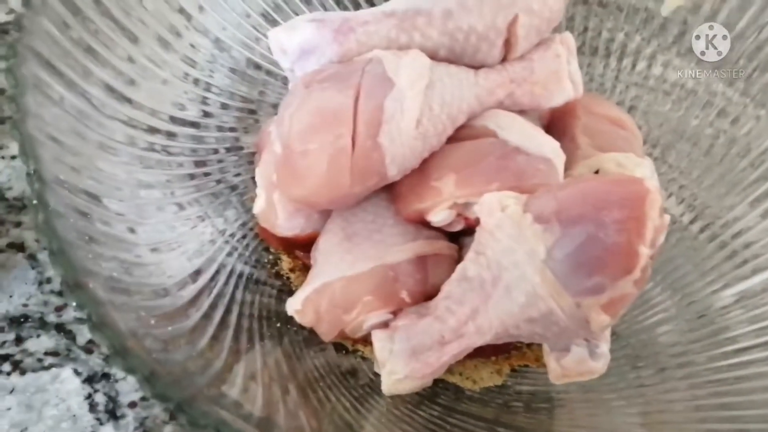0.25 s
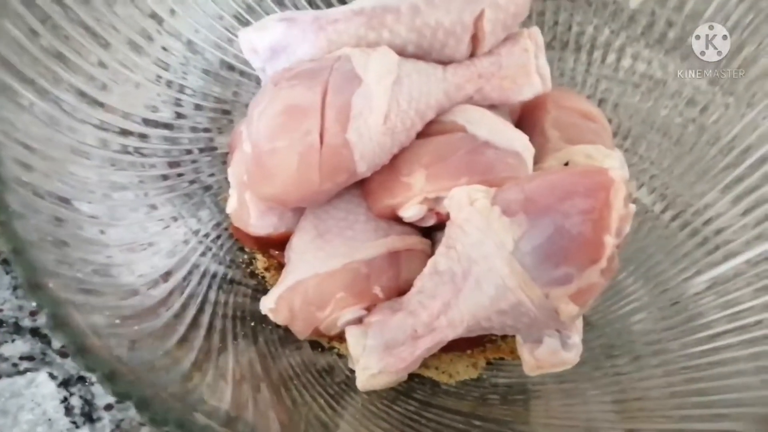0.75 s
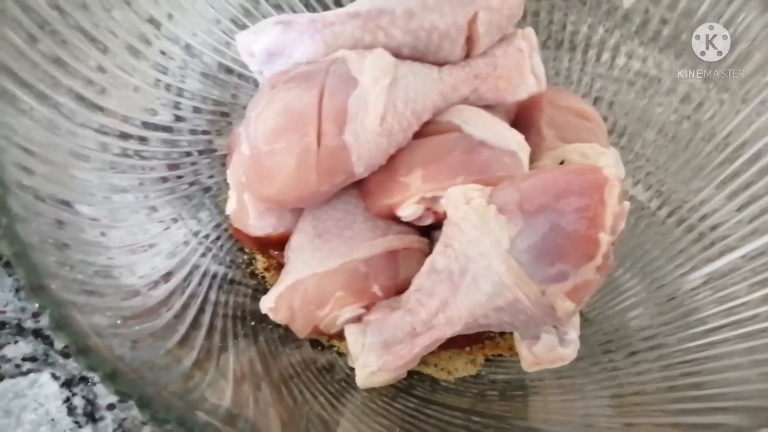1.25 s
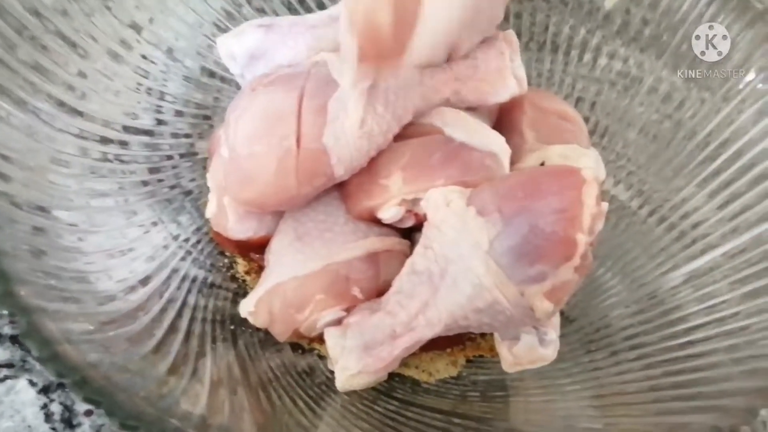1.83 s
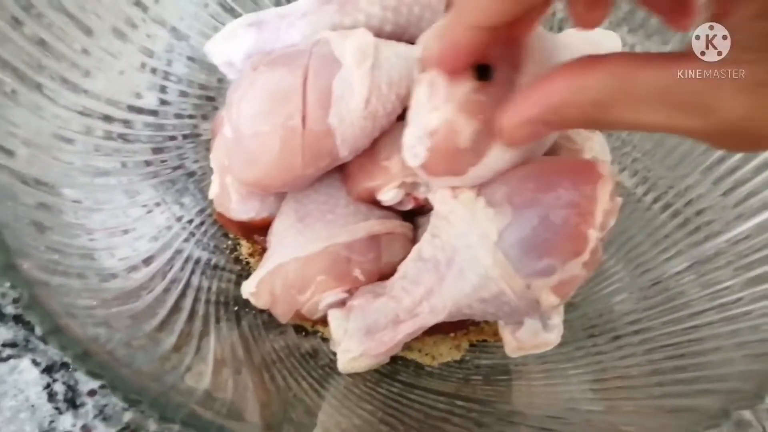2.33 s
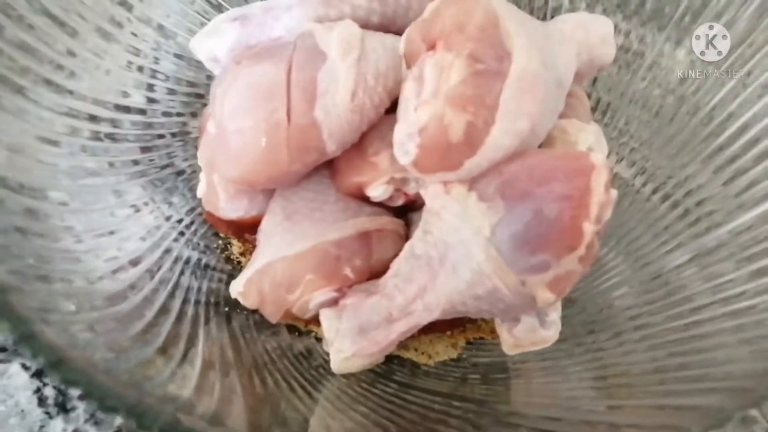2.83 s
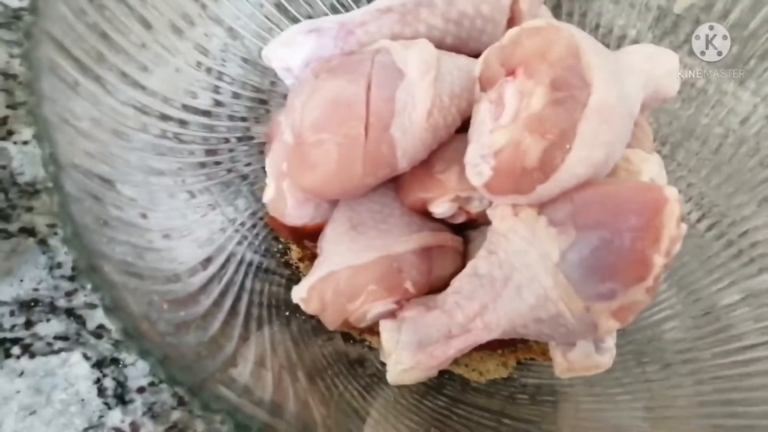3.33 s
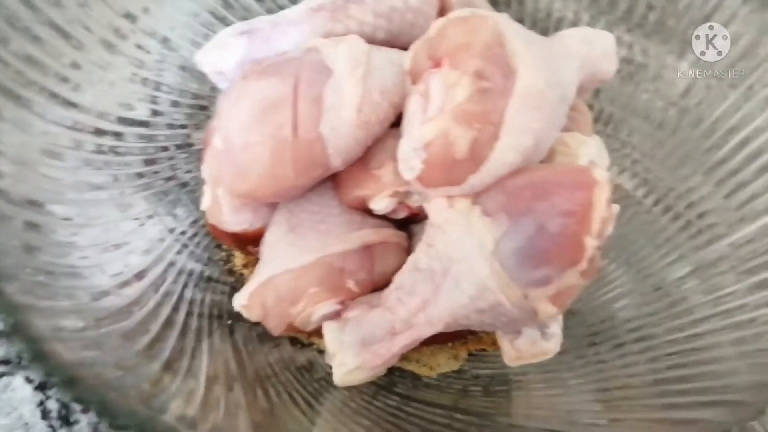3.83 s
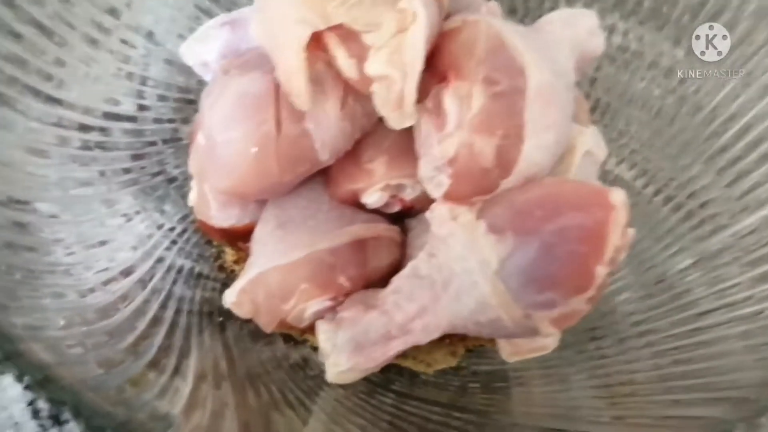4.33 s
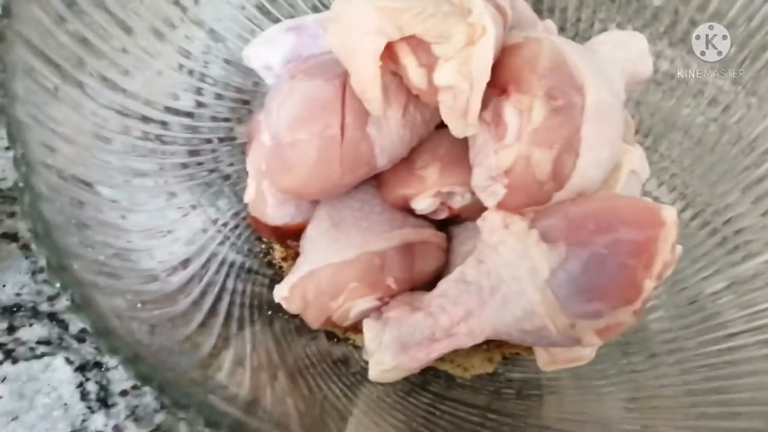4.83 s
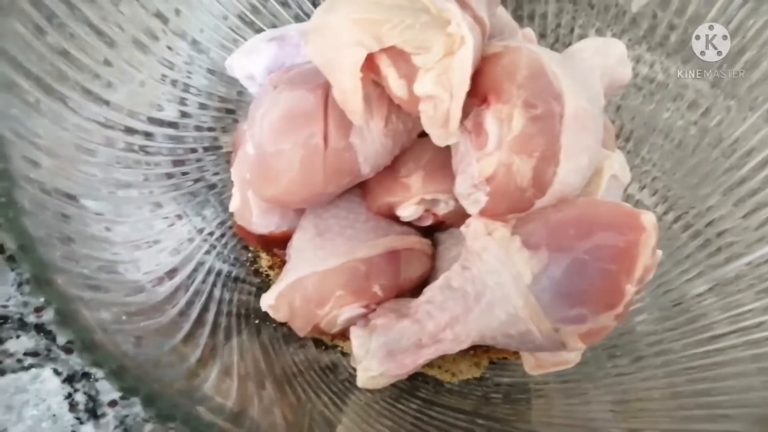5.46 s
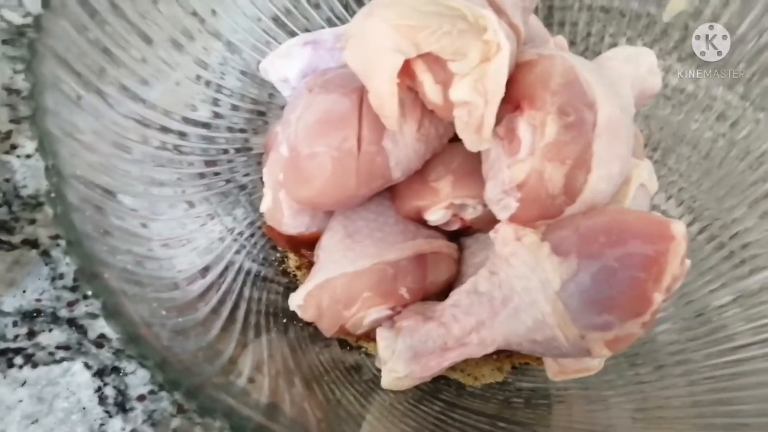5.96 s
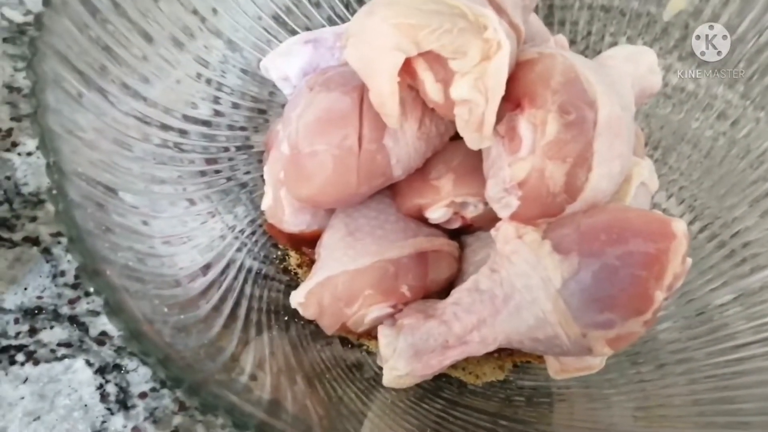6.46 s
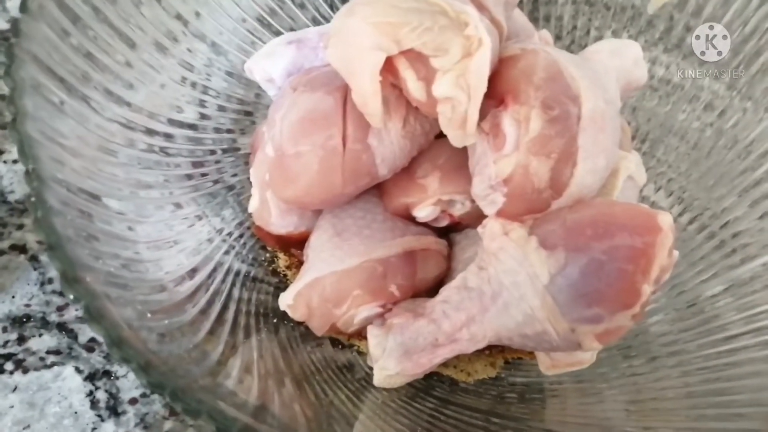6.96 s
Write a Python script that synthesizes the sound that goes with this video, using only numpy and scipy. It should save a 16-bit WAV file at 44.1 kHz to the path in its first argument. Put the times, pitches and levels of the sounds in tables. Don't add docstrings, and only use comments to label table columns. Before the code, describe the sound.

Raw chicken pieces knock hard against a glass bowl in short hollow bursts, with faint wet ticks between, over a quiet low kitchen hum.

```python
import sys
import numpy as np
from scipy import signal
from scipy.fft import rfft, irfft, next_fast_len
from scipy.io import wavfile
from scipy.ndimage import uniform_filter1d

SR = 44100
rng = np.random.default_rng(int(sys.argv[2]) if len(sys.argv) > 2 else 0)


def int16_out(signal):
    q = np.round(np.clip(np.atleast_2d(signal).T, -1, 1) * 32767)
    wavfile.write(sys.argv[1], SR, q.astype(np.int16))


def convert_level_to_amplitude(level_db):
    exponent = np.asarray(level_db, float) / 20
    return 10 ** exponent


N = 317106

# frequency [Hz], density [dB per Hz].
FLESH_SLAP = [(30, -27), (250, -33.5), (420, -41), (550, 9), (800, 6.5), (1200, -10), (2200, -18),
              (3200, -41), (5000, -59)]


def knocks():
    # start [s], peak [dB], crack [dB], pitch [Hz], room [dB].
    blows = [
        (1.0378, -14, -18.5, 760, -12),
        (1.2127, -9, -21, 740, -14.5),
        (1.537, -25.5, -26, 1030, -14),
        (1.9905, -47, -36.5, 834, -19.5),
        (4.7, -29.5, -54.5, 763, -14.5),
        (4.775, -43, -31.5, 1160, -10),
        (5.5527, -11.5, -21, 710, -12),
        (5.804, -21, -25.5, 725, -14.5),
    ]
    # pitch ratio, level [dB].
    wall_modes = [(.7, -33), (1, 0), (1.502, -6), (2.099, -25), (2.599, -23.5), (3.7, -43)]
    # frequency [Hz], density [dB per Hz].
    crack_colour = [(760, -39), (1300, -4.5), (3040, -14.5), (3670, -28.5), (4750, -18), (5550, -14),
                    (8410, -29.5), (11100, -53.5), (14600, -43.5), (15500, -73)]
    earlier_db = -40.5
    hard_crack_db, tilt_per_db, steepest_db = -21, 2, 16
    low_cut_hz = 326.4
    out, t = np.zeros((2, N)), np.arange(SR // 20) / SR
    add(out, -.3, convert_level_to_amplitude(earlier_db) * room(dull_db=8))
    for s, db, crack_db, hz, wet_db in blows:
        damped = convert_level_to_amplitude(-900 * t - 60 * np.maximum(t - .0049, 0) / .007)
        swing = np.zeros((2, len(t)))
        for port in range(2):
            for ratio, level_db in wall_modes:
                mode_db = level_db + rng.normal(0, 1) - 410 * (ratio - 4) * t
                swing[port] += convert_level_to_amplitude(mode_db) * np.sin(2 * np.pi * hz * ratio * t)

        tilt_db = -np.clip(tilt_per_db * (hard_crack_db - crack_db), 0, steepest_db)
        colour = lambda f: convert_level_to_amplitude(along(crack_colour, f) + tilt_db * np.log2(f / 5000 + 0.082))
        crack_decay = convert_level_to_amplitude(-60 * t / 0.044) + 0.75 * convert_level_to_amplitude(-60 * t / 0.0024)
        crack = convert_level_to_amplitude(crack_db + 11) * crack_decay * rush(len(t), colour)
        slap = convert_level_to_amplitude(-6.5) * rush(len(t), lambda f: convert_level_to_amplitude(along(FLESH_SLAP, f)), [(100, 0.98), (2000, 0.33)])

        rise = np.clip(t / .0011, 0, 1)
        body = (swing + slap) * rise ** 2 * damped
        first_copy = convert_level_to_amplitude(-5.5) * np.roll(body, round(0.0078 * SR), axis=1)
        second_copy = convert_level_to_amplitude(-15.0) * np.roll(body, round(.0125 * SR), axis=1)
        blow = body + first_copy + second_copy + crack * np.sqrt(rise)
        blow = signal.sosfilt(signal.butter(2, low_cut_hz, "high", fs=SR, output="sos"), blow)
        add(out, s, convert_level_to_amplitude(db + np.array([[-1], [1]])) * blow, lag=12)
        dull_db = 0.57 * max(-19.0 - crack_db, 0)
        add(out, s + 0.0023, convert_level_to_amplitude(db + wet_db - 11.0) * room(dull_db))
    return out


def room(dull_db=0):
    # frequency [Hz], density [dB per Hz].
    echo = [(180, -74), (300, -38.5), (339, -22.5), (396, -40), (448, -13), (629, -9), (701, -2),
            (844, -4.5), (1050, -7), (1340, -25.5), (2070, -22), (3180, -23), (3950, -31.5), (5720, -19),
            (12000, -68.5), (15600, -102), (22000, -120)]
    # frequency [Hz], extra loss [dB per s].
    absorb = [(800, 13), (2000, 8.5), (6000, 39), (12000, 53.5)]
    # frequency [Hz], width [Hz], boost [dB].
    hollow = [(750, 20, 5), (1072, 32, 8), (1657, 70, 5), (2160, 146, 0.5)]
    level_db, fade_db_per_s, swell_db, swell_s = 5, 20, 0, .03
    drop_from_s, drop_to_s, drop_db_per_s = 0.42, 0.58, 41
    hollow_db = lambda f: sum(db / (1 + ((f - c) / w) ** 2) for c, w, db in hollow)
    dulling_db = lambda f: dull_db * np.log2(np.maximum(f / 1100, 1))
    colour = lambda f: convert_level_to_amplitude(along(echo, f) + hollow_db(f) - dulling_db(f))
    hz, t, z = signal.stft(rush(round(1.4 * SR), colour), SR, nperseg=256)
    fade_db = level_db - swell_db * np.exp(-t / swell_s)
    fade_db = fade_db - drop_db_per_s * (np.clip(t, drop_from_s, drop_to_s) - drop_from_s)
    fade_db = fade_db - t * (fade_db_per_s + along(absorb, hz)[:, None])
    clumps = uniform_filter1d(rng.standard_normal(fade_db.shape), size=4, axis=0)
    clumps = uniform_filter1d(clumps, size=8, axis=1)
    fade_db = fade_db + 1.8 * unit(clumps)
    return signal.istft(z * convert_level_to_amplitude(fade_db), SR, nperseg=256)[1] * convert_level_to_amplitude([[-3], [3]])


def thumps():
    # start [s], peak [dB], t60 [s].
    landings = [
        (1.046, -42, 0.061),
        (1.226, -40.5, 0.24),
        (1.992, -43, 0.16),
        (2.03, -47, 0.24),
        (5.569, -45.5, 0.28),
    ]
    out, t = np.zeros((2, N)), np.arange(SR // 4) / SR
    for s, db, t60_s in landings:
        push = rush(len(t), lambda f: (f / 120) ** 2 / (1 + (f / 120) ** 6), [(100, 0.91)])
        add(out, s, convert_level_to_amplitude(db + 2.5 - 60 * t / t60_s) * np.clip(t / 0.0027, 0, 1) * push)
    return out


def ticks():
    # start [s], peak [dB], centre [Hz], room [dB].
    wet_ticks = [(0.1867, -54.5, 5300, -4), (0.3242, -44, 6330, -11), (0.344, -50, 5360, -10),
                 (0.3716, -37, 5040, -14), (0.41, -44.5, 4900, -1), (0.6143, -53, 5550, 0.5),
                 (0.7267, -50, 5200, -8), (3.1775, -35.5, 6500, -9.5), (3.214, -57, 6290, -7),
                 (3.2316, -50, 5750, -6), (3.249, -48, 5870, -12), (3.277, -51, 5500, -20),
                 (4.13, -53.5, 6100, -13), (4.2308, -59, 5730, -25.5), (4.9706, -59, 5180, -1),
                 (6.4875, -29.5, 6500, -13), (6.5818, -36, 5850, -8), (6.605, -43, 6500, -22)]
    specks = [(1.9594, -63, 11400, -20), (2.0023, -61, 13750, -21), (2.4523, -47, 9050, -20),
              (2.6514, -65, 8130, -20), (4.129, -56.5, 13230, -9), (4.809, -60, 9200, -16),
              (4.8768, -62.5, 9500, -3), (6.1694, -65, 8380, -20)]
    smacks = [(0.3368, -63, 3160, -8), (0.3722, -42, 2070, -10.5), (1.9914, -43, 1580, -19),
              (2.0433, -58, 1730, -17), (3.1774, -60.5, 2014, -8.5), (3.2094, -55.5, 3000, -3),
              (3.2336, -61, 1984, -8), (3.253, -64, 2020, -6), (3.291, -67, 2620, -14),
              (4.7011, -42, 1800, -12), (5.0994, -55.5, 2000, -5), (5.1843, -62, 1770, -6),
              (6.488, -41, 1940, -9.5), (6.599, -52.5, 3400, -4.5)]
    pricks = [(0.2526, -49, 4100, -26), (1.9793, -45.5, 5040, -17), (2.4511, -39.5, 5820, -16.5),
              (4.774, -57.5, 5300, -19), (4.9728, -55.5, 1930, 2), (5.1816, -46.5, 7200, -15),
              (6.205, -51.5, 5290, -11), (6.5942, -44, 7850, -4.5)]
    snaps = [(.3716, -51, 12000, -13), (.6143, -55, 14000, -21), (.7267, -53, 14000, -19),
             (1.037, -32, 9500, -1.5), (2.0435, -38.5, 12800, -24.5), (3.1775, -50, 14350, -16.5),
             (6.4875, -42.5, 12900, -6), (6.5818, -55, 14000, -11)]
    # frequency [Hz], gain [dB].
    port_colour = [(2000, 8), (3300, 8.5), (3700, -4.5), (4400, -11.5), (4800, -3.5), (5400, -2.5),
                   (7000, -4.5), (10000, -12), (15000, -7)]
    # rows, t60 [s], width [octaves]
    kinds = [(wet_ticks, 0.038, .44), (specks, 0.007, 0.1), (smacks, 0.02, 0.34),
             (pricks, 0.021, 0.19), (snaps, .018, 0.6)]
    out, t = np.zeros((2, N)), np.arange(SR // 2) / SR
    soft = np.clip(t / .0006, 0, 1)
    for rows, t60_s, octaves in kinds:
        for s, db, hz, wet_db in rows:
            bell = lambda f: np.exp(-.5 * (np.log2(f / hz + 1e-9) / (1.28 * octaves)) ** 4)
            band = lambda f: bell(f) * convert_level_to_amplitude(along(port_colour, f))
            puff = soft * convert_level_to_amplitude(-60 * np.maximum(t - .002, 0) / t60_s) * rush(len(t), band)
            tail_gain = convert_level_to_amplitude(wet_db - 8.0 - 60 * t / 0.75) * np.clip(t / 0.0044, 0, 1)
            tail = tail_gain * rush(len(t), lambda f: band(f) / (1 + (f / 8000) ** 4))
            add(out, s, convert_level_to_amplitude(db - 5.5) * (puff + tail))
    return out


def rim():
    # peak time [s], peak [dB], pitch [Hz], t60 [s], upper mode [dB].
    rim_taps = [(0.26, -33, 537, 0.1, -10), (0.287, -36, 598, 0.14, -15), (0.375, -39.5, 570, 0.14, -6),
                (0.414, -49.5, 580, 0.14, -15), (0.468, -36.5, 614, 0.033, -23),
                (0.737, -46, 560.4, 0.0094, -12), (4.776, -36, 524, 0.051, -1),
                (4.978, -53.5, 563, 0.45, -4), (5.094, -49.5, 574, 0.089, -19),
                (5.135, -54, 575, 0.21, -15.5), (5.185, -56, 547, 0.052, -19.5),
                (6.491, -34, 548, 0.05, -14), (6.586, -40.5, 570, 0.073, -17)]
    edge_taps = [
        (0.617, -40.5, 579, 0.082, -8.5),
        (0.674, -48, 592, 0.041, -7),
        (1.989, -47.5, 538, 0.077, -3.5),
        (3.181, -56, 627, 0.063, 2),
        (3.266, -53.5, 588, 0.097, -13),
    ]
    second_ratio, third_ratio = 1.95, 3.275
    out, t = np.zeros((2, N)), np.arange(SR // 2) / SR
    near = lambda centre, width: rush(len(t), lambda f: 1 / (1 + ((f - centre) / width) ** 2))
    taps = [(*row, second_ratio) for row in rim_taps] + [(*row, third_ratio) for row in edge_taps]
    for s, db, hz, t60_s, upper_db, ratio in sorted(taps):
        upper_hz = hz * ratio
        ring = convert_level_to_amplitude(-60 * t / t60_s) * (np.sin(2 * np.pi * hz * t) + 0.39 * near(hz, 60))
        slap = convert_level_to_amplitude(1) * rush(len(t), lambda f: convert_level_to_amplitude(along(FLESH_SLAP, f)))
        upper = convert_level_to_amplitude(upper_db - 60 * t / 0.053) * (near(upper_hz, 92) + slap)
        tail = convert_level_to_amplitude(-24.5 - 60 * t / 0.96) * (near(hz, 34) + convert_level_to_amplitude(upper_db + 3) * near(upper_hz, 200))
        gain = convert_level_to_amplitude(db + np.array([[0], [4]])) * (1 - np.exp(-t / 0.0022))
        add(out, s - .002, gain * (ring + upper + tail), lag=8)
    return out


def pings():
    # start [s], level [dB], frequency [Hz], t60 [s].
    modes = [
        (.252, -44.5, 4140, 0.052),
        (1.982, -53, 5270, 0.19),
        (1.98, -67, 3330, 0.37),
        (2.45, -45, 5930, 0.031),
        (4.775, -39.5, 1927, 0.024),
        (6.5, -67, 1760, 0.16),
    ]
    out, t = np.zeros((2, N)), np.arange(SR // 4) / SR
    for s, db, hz, t60_s in modes:
        rough = rush(len(t), lambda f: 1 / (1 + ((f - hz) / 80) ** 2))
        gain = convert_level_to_amplitude(db - 60 * t / t60_s) * np.clip(t / 0.0033, 0, 1)
        add(out, s, gain * (np.sin(2 * np.pi * hz * t) + rough), lag=4)
    return out


def scrape():
    # start [s], rise [s], hold [s], level [dB], fall [dB per s].
    strokes = [
        (0.245, .07, 0.031, -53.5, 99),
        (4.42, .09, 0.022, -72, 90),
    ]
    # frequency [Hz], density [dB per Hz].
    skin = [(1180, -31), (2000, -6.5), (2460, -10.5), (4360, -3.5), (4750, -7.5), (5130, -2.5), (7290, -5),
            (9030, -14.5), (15500, -25)]
    slips = convert_level_to_amplitude(2.4 * unit(uniform_filter1d(rng.standard_normal(N), size=300)))
    slides = sum(stroke_gain(*row, depth_db=9) for row in strokes)
    return slides * unit(slips * rush(N, lambda f: convert_level_to_amplitude(along(skin, f))))


def bumps():
    # peak time [s], peak [dB], rise [s], fall [s].
    pushes = [(0.12, -50, 0.11, 0.057), (0.25, -61, 0.056, .05), (1.99, -77, .04, .2),
              (2.2, -54.5, .05, 0.4), (4.2, -59.5, 0.2, 0.093), (4.315, -61, .04, 0.16),
              (4.635, -43.5, 0.025, 0.4), (4.872, -50, .12, 0.069), (5.08, -75, .2, .05),
              (7.0, -77, .05, 0.17), (7.15, -52, .045, 0.049)]
    # frequency [Hz], density [dB per Hz].
    hand = [(8.8, -28), (15, -19), (38, 8), (75, 2), (138, -10), (183, -21), (200, -24), (260, -38.5),
            (440, -120)]
    span_db = 21
    shake = rush(N, lambda f: convert_level_to_amplitude(along(hand, f)), [(30, .4)]) * convert_level_to_amplitude([[-5], [3]])
    gain = sum(stroke_gain(s - rise_s, rise_s, 0, db, span_db / fall_s, span_db)
               for s, db, rise_s, fall_s in pushes)
    return convert_level_to_amplitude(-1.5) * gain * shake


def hum():
    # order, level [dB], left-right difference [dB].
    harmonics = [(1, -85.5, -9.5), (2, -63.5, -5), (3, -64.5, -1), (4, -72, -11), (5, -72, 2),
                 (6, -68, -8.5), (7, -67, -2.5), (8, -65.5, -2.5), (9, -63, -8), (10, -80, -2)]
    # frequency [Hz], density [dB per Hz].
    drone = [(15, -12.5), (49, -5), (65, -15), (100, -4.5), (160, -12.5), (240, -14.5), (290, 0),
             (335, -11), (375, -3), (430, -13), (470, -32), (520, -120)]
    air = [(250, -27), (420, -13.5), (460, -11), (552, -10), (704, -14.5), (911, -14), (1080, -16.5),
           (1370, -20.5), (1600, -22), (2640, -20), (4160, -26), (5380, -18), (7740, -31), (14900, -29.5),
           (15800, -24.5)]
    hum_hz = 43.345
    turn = 2 * np.pi * hum_hz * np.arange(N) / SR + 2.1
    tones = np.zeros((2, N))
    for order, db, pan_db in harmonics:
        k = round(order)
        phase = -2.2 + .017 * k * k * (-1) ** k
        tones += np.sqrt(2) * convert_level_to_amplitude(db + pan_db * np.array([[.5], [-.5]])) * np.cos(k * turn + phase)
    rumble = convert_level_to_amplitude(-61) * rush(N, lambda f: convert_level_to_amplitude(along(drone, f))) * convert_level_to_amplitude([[-2], [2]])
    whine_db = lambda f: 9 / (1 + ((f - 2670) / 35) ** 2)
    hiss = rush(N, lambda f: convert_level_to_amplitude(along(air, f) + whine_db(f)))
    return tones + rumble + convert_level_to_amplitude(-68) * hiss * convert_level_to_amplitude([[-1.5], [1.5]])


def stroke_gain(start_s, rise_s, hold_s, db, fall_db_per_s, depth_db):
    t = np.arange(N) / SR - start_s
    climb_db = depth_db * np.clip(1 - t / rise_s, 0, 1)
    fall_db = fall_db_per_s * np.maximum(t - rise_s - hold_s, 0)
    return (t > 0) * convert_level_to_amplitude(db - climb_db - fall_db)


def unit(x):
    return x / np.sqrt(np.mean(x ** 2) + 1e-20)


def along(points, hz):
    f, v = np.transpose(points)
    return np.interp(np.log(hz + 1), np.log(f + 1), v)


def rush(n, gain, alike=None):
    # frequency [Hz], left-right likeness [-1 to 1].
    diffuse = [(60, .93), (290, 0.71), (640, 0.24), (1400, 0)]
    m = next_fast_len(n + 2048)
    hz = np.fft.rfftfreq(m, 1 / SR)
    likeness = along(diffuse if alike is None else alike, hz)
    turn = np.arccos(np.clip(likeness, -1, 1)) / 2
    spectrum = rfft(rng.standard_normal((2, m))) * gain(hz)
    mid, side = irfft(spectrum * [np.cos(turn), np.sin(turn)], m)[:, :n]
    return unit(np.array([mid + side, mid - side]))


def add(out, s, sound, lag=0):
    for ch, start in enumerate((round(s * SR), round(s * SR) + lag)):
        part = sound[ch][max(-start, 0):N - start]
        out[ch, max(start, 0):][:len(part)] += part


def scene():
    return knocks() + thumps() + ticks() + pings() + rim() + scrape() + bumps() + hum()


def band_limit(x):
    return signal.sosfilt(signal.butter(12, 16430, fs=SR, output="sos"), x)


def record(dry):
    top_hz = 15450
    over_db = np.maximum(20 * np.log10(np.abs(dry).max(axis=0) + 1e-9) + 22, 0)
    recovery_db = 22 * np.arange(N) / SR
    held_db = np.maximum.accumulate(0.37 * over_db + recovery_db) - recovery_db
    duck_db = np.roll(uniform_filter1d(held_db, size=200), round(0.0037 * SR))
    spectrum = rfft(dry * convert_level_to_amplitude(-duck_db))
    kept = irfft(spectrum * (np.fft.rfftfreq(N, 1 / SR) < top_hz), N)
    return band_limit(kept)


dry = scene()
out = record(dry)
int16_out(out)
```